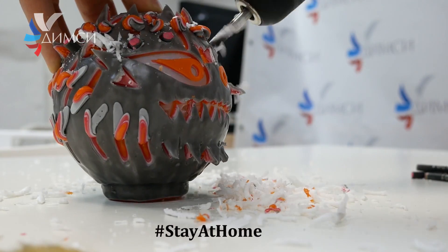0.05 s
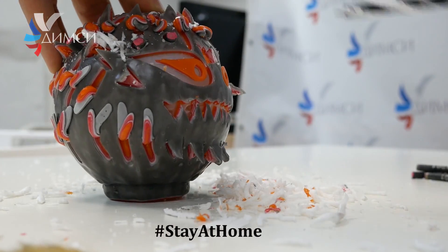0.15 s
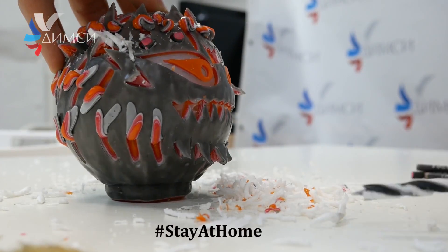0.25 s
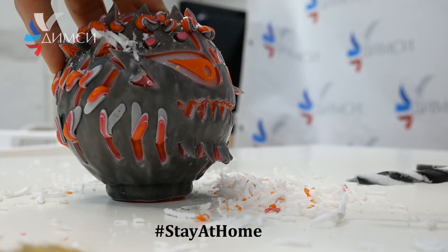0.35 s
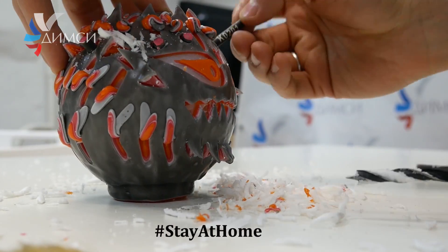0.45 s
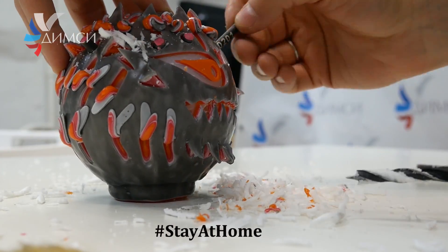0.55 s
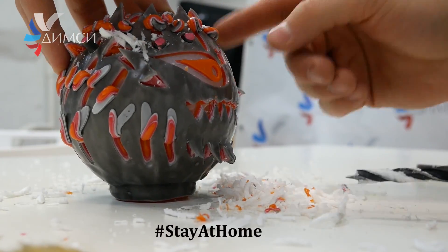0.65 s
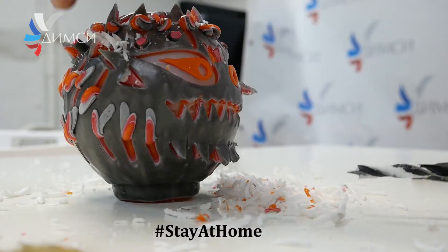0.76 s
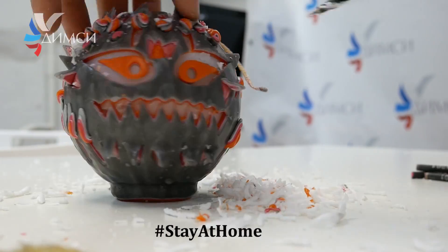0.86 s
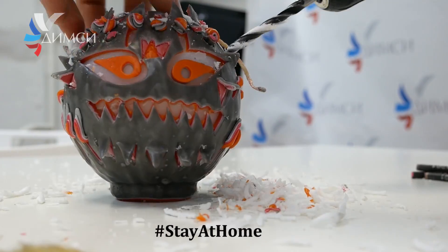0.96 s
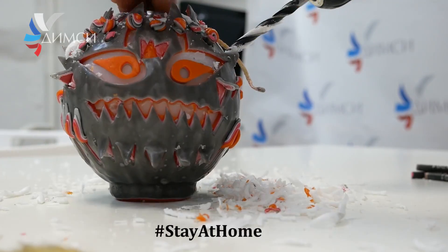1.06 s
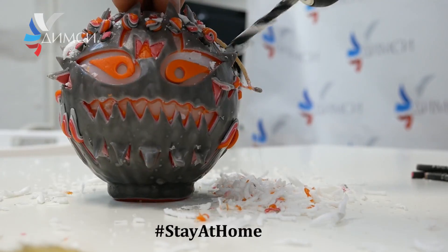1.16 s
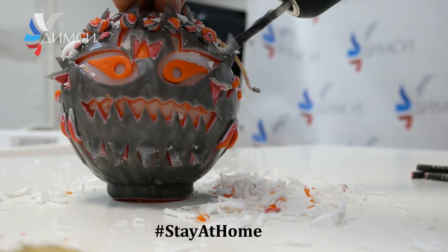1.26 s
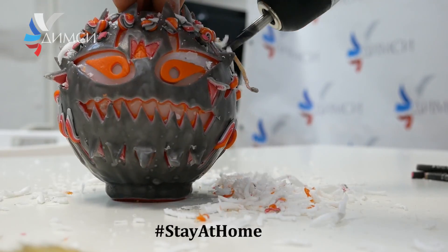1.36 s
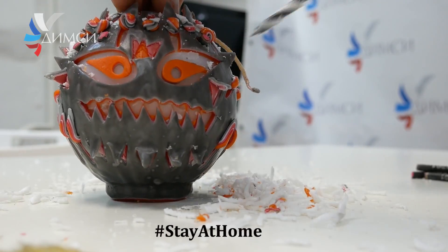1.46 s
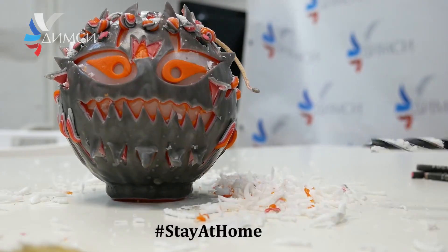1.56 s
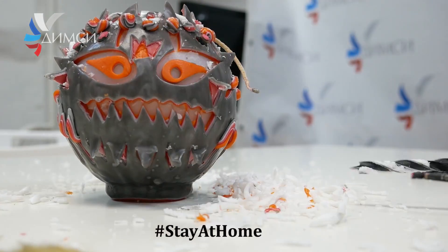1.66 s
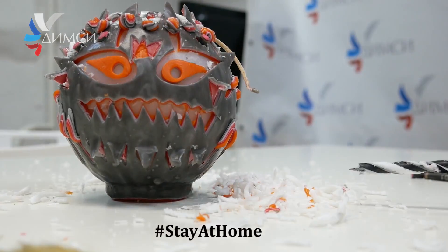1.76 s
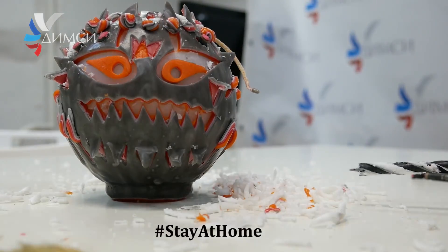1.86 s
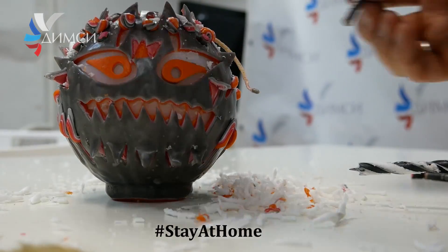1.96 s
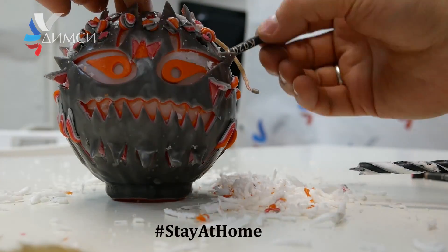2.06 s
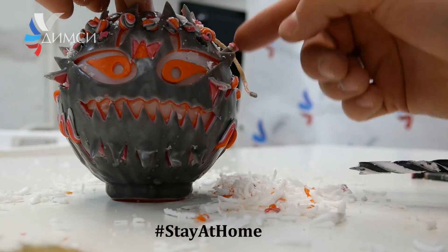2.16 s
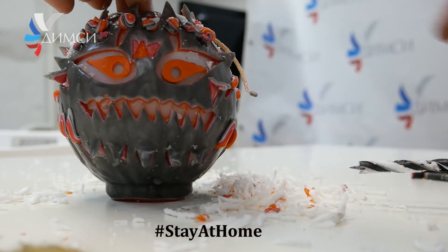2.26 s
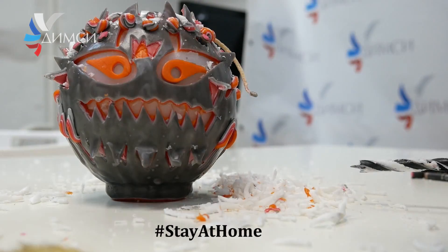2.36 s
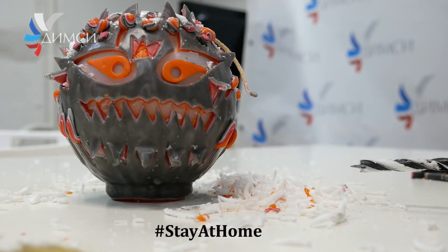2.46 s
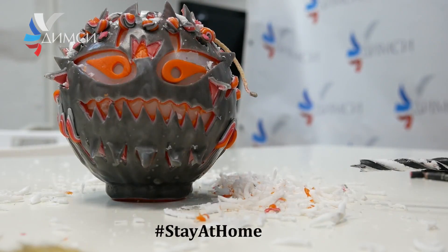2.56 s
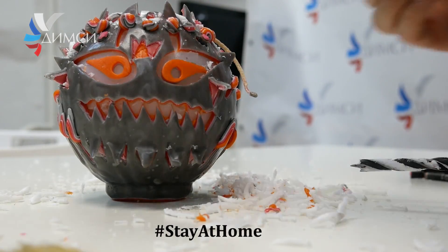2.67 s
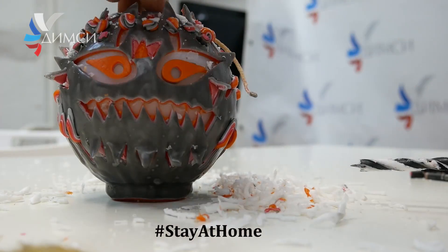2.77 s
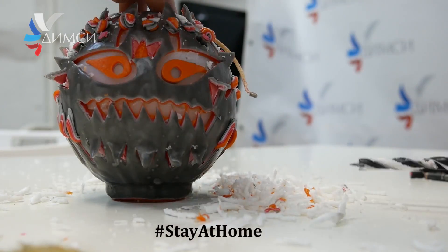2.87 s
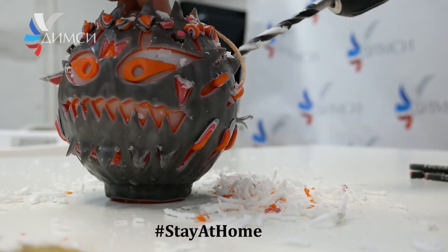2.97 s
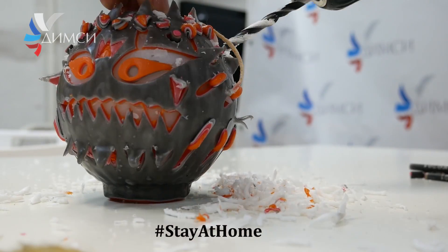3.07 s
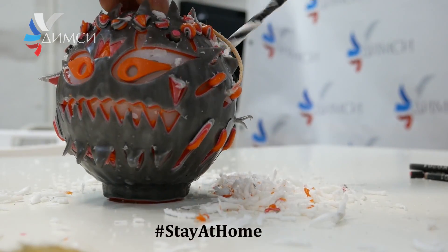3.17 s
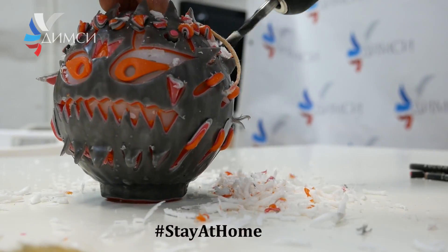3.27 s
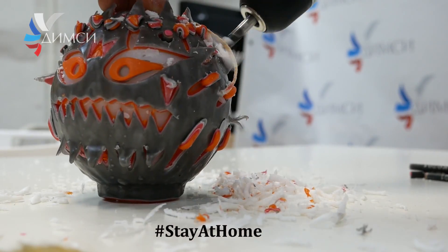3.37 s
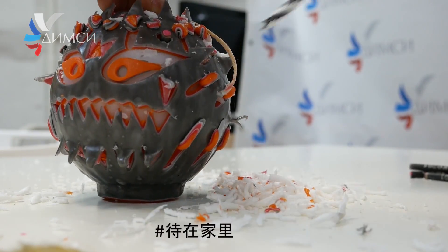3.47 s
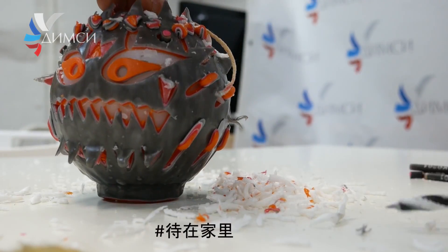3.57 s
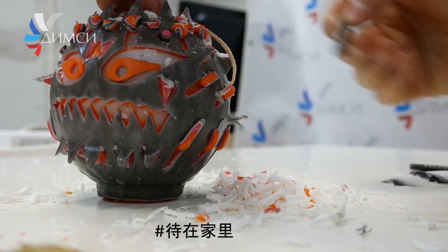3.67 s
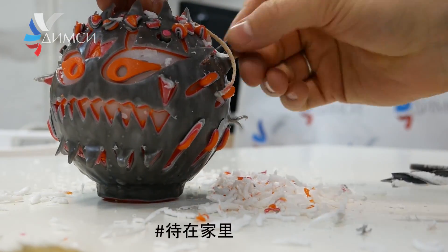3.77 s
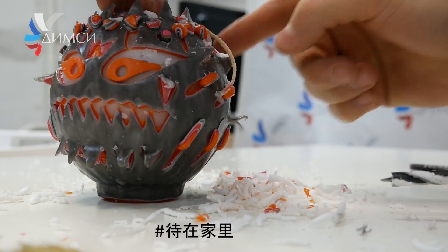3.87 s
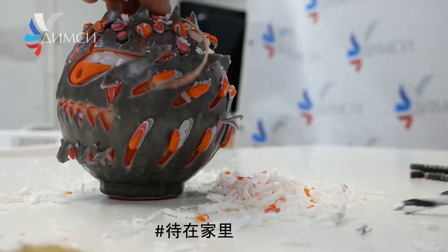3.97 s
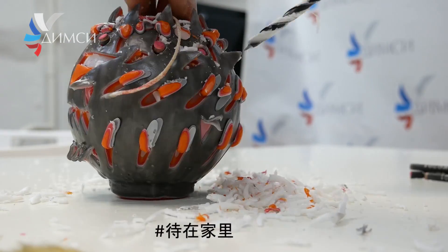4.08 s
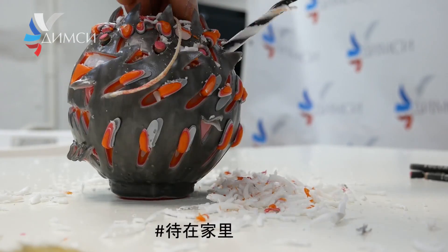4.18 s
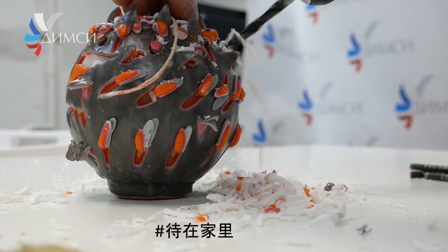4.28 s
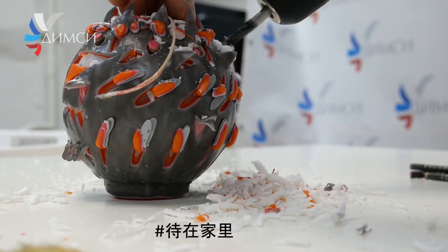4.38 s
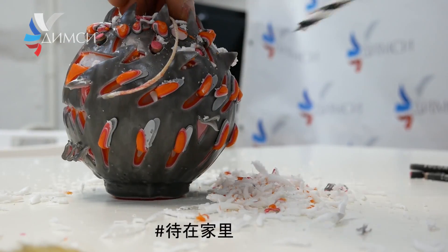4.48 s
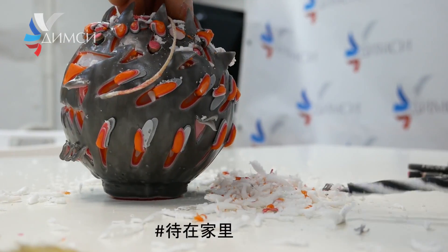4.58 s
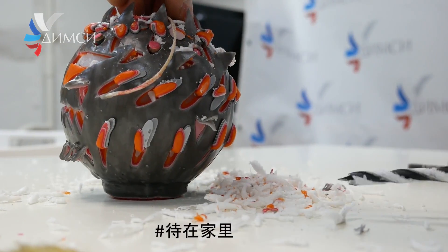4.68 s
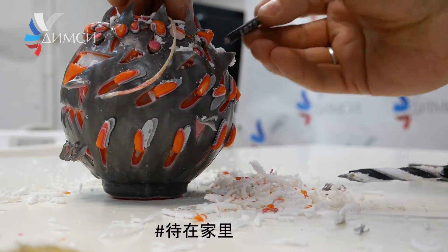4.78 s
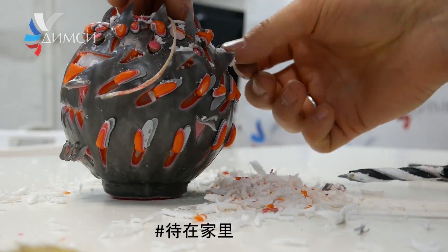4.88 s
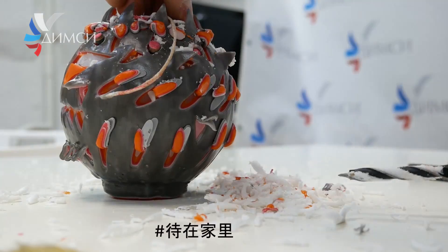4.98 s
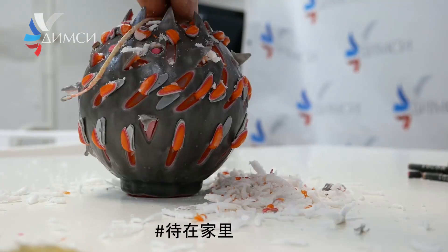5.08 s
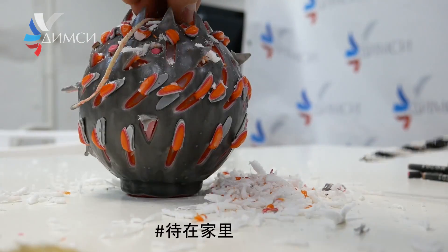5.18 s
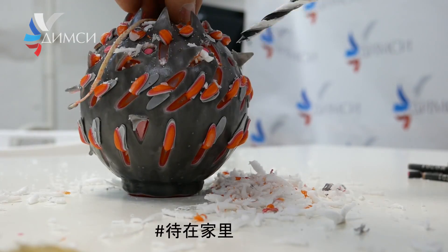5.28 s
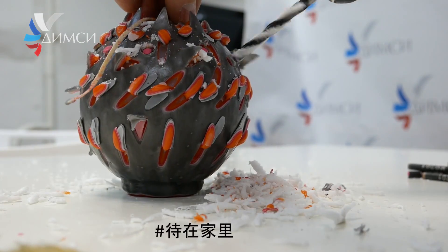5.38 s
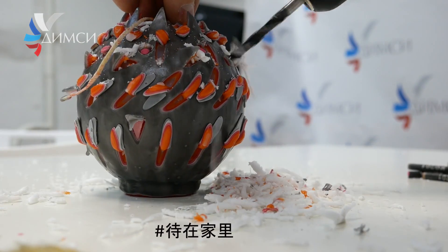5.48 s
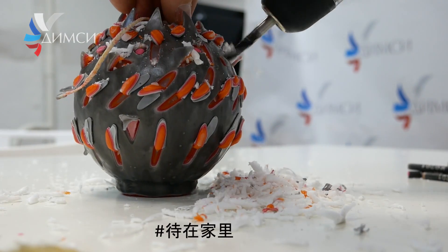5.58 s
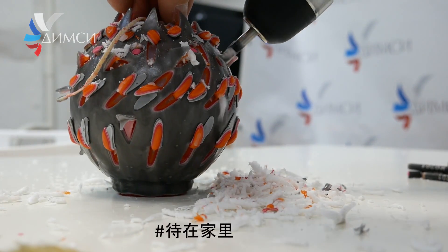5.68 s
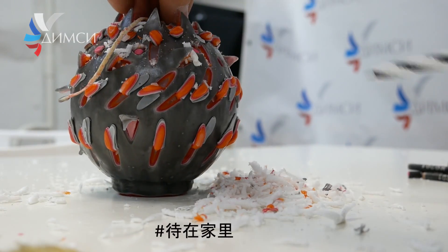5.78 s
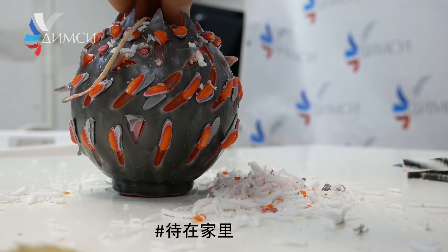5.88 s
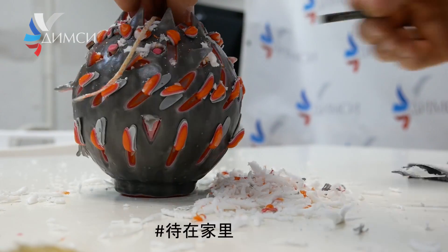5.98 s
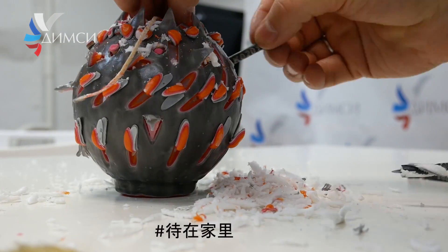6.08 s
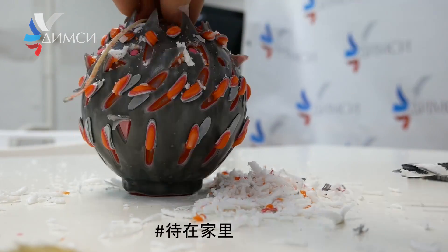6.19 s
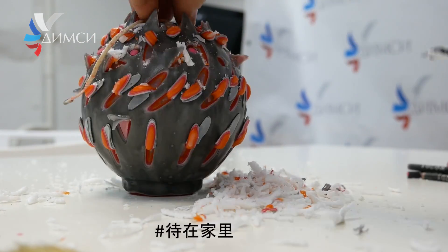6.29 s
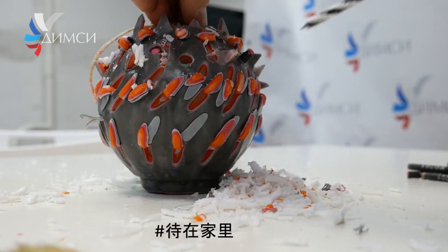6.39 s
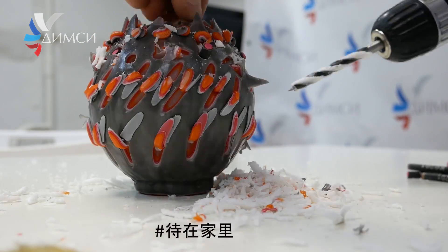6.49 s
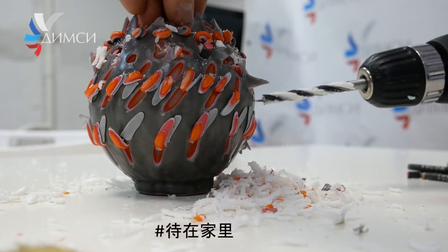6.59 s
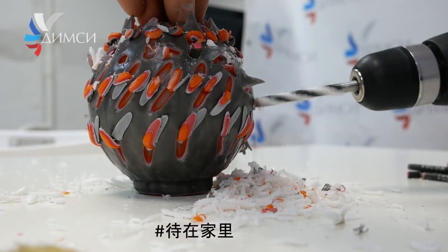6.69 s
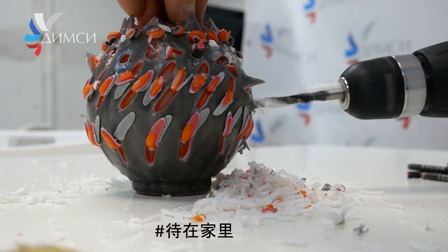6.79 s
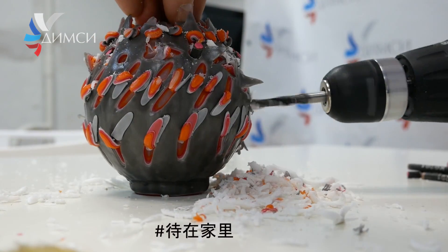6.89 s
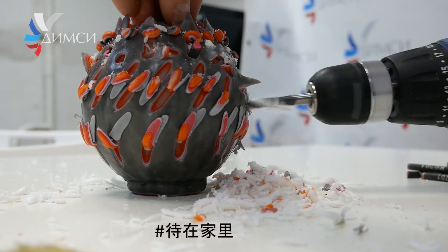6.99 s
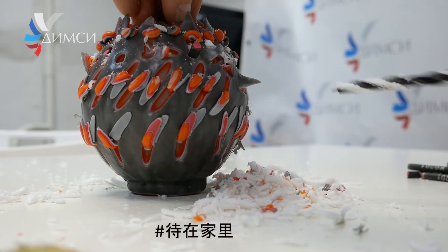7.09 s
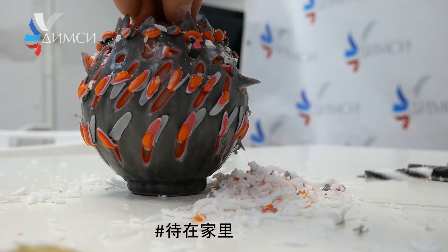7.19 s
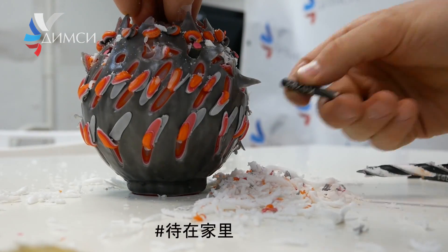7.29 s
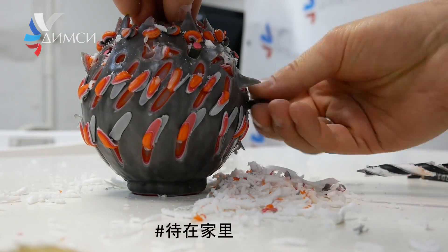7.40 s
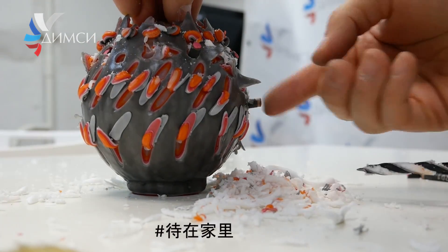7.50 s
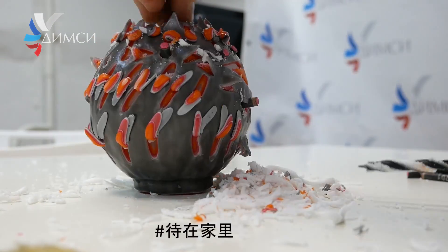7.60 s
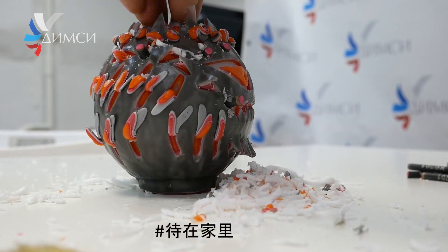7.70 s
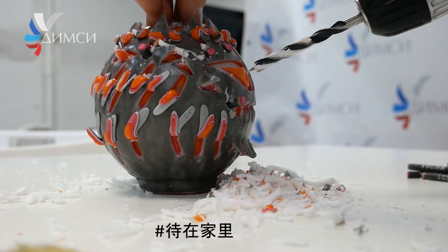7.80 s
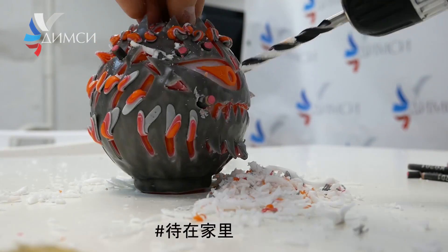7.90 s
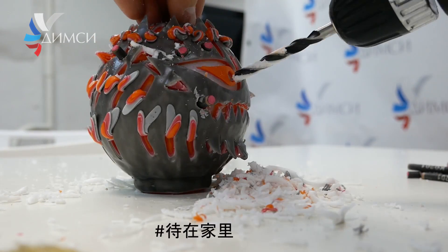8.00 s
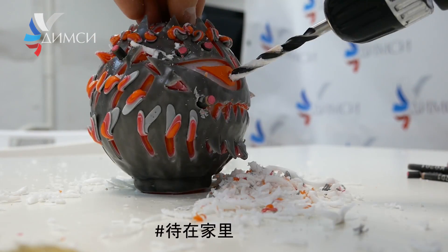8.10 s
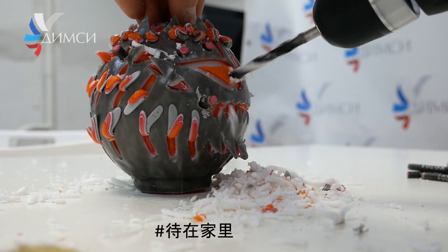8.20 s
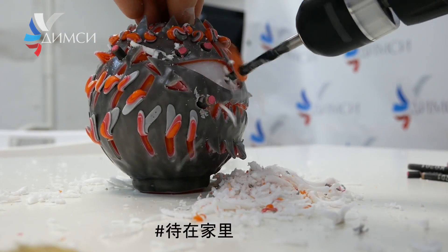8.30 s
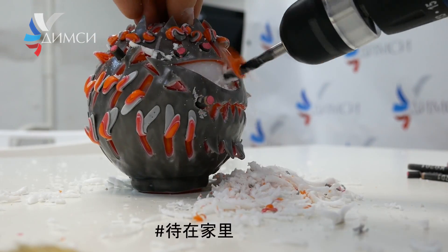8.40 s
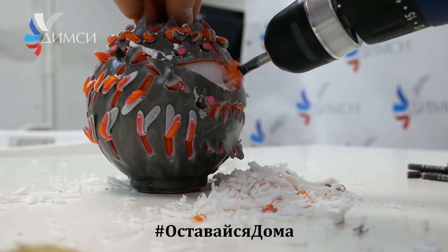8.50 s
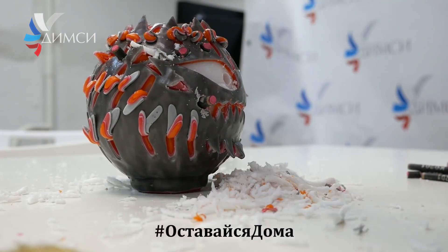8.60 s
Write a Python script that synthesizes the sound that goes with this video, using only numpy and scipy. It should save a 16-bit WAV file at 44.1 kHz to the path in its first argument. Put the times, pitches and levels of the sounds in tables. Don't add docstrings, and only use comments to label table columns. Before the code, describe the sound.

A cordless drill whirs in seven short bursts into a wax ball, each spinning down to a trigger thump, with clicks and rustling between.

```python
import sys
import numpy as np
from scipy import signal
from scipy.fft import rfft, irfft, next_fast_len
from scipy.io import wavfile

SR = 44100
rng = np.random.default_rng(int(sys.argv[2]) if len(sys.argv) > 2 else 0)


def voltage_ratio(level):
    return 10 ** (np.asarray(level, float) / 20)


def unload_audio(sound):
    columns = np.transpose(np.atleast_2d(sound))
    steps = np.round(np.clip(columns, -1, 1) * 32767)
    wavfile.write(sys.argv[1], SR, steps.astype(np.int16))


N = 381465
FAST = next_fast_len(N)
LEFT_RIGHT = np.array([[1], [-1]])


def at_hz(points, hz):
    points = np.array(points)
    return np.interp(np.log(hz), np.log(points[:, 0]), points[:, 1])


def drift(rate_hz, at=slice(None)):
    lowpass = signal.butter(2, rate_hz, fs=SR / 20, output="sos")
    slow = signal.sosfilt(lowpass, rng.standard_normal((2, N // 20 + 1002)))[:, 1000:]
    slow = slow / slow.std()
    where = np.arange(N)[at] / 20
    return np.array([np.interp(where, np.arange(len(row)), row) for row in slow])


def coloured(source, gain, low_hz, high_hz):
    hz = np.arange(1, FAST // 2 + 2) * SR / FAST
    edges = ((1 + (low_hz / hz) ** 8) * (1 + (hz / high_hz) ** 8)) ** -.5
    out = irfft(source * gain(hz) * edges, FAST)[:, :N]
    return out / out.mean(axis=0).std()


def burst(length, rise_s, t60_s):
    t = np.arange(length) / SR
    shape = (1 - np.exp(-(t / rise_s) ** 2)) * voltage_ratio(-60 * t / t60_s)
    return shape / shape.max()


def add(out, start_s, sound, pan_db):
    i = round(start_s * SR)
    out[:, i:i + sound.shape[1]] += (sound * voltage_ratio(LEFT_RIGHT * pan_db / 2))[:, :N - i]


# (pitch_hz, level_db per Hz)
ROOM_COLOUR = [(15, -46), (25, -17.5), (207, -3.5), (269, -3.5), (465, -6), (784, -8.5), (1040, -13),
               (2060, -21), (2600, -22.5), (3130, -25), (9860, -50.5), (12800, -42.5), (16600, -80.5),
               (22000, -120)]
# hum, finger rustle, its bright part [Hz]
QUIET_EDGES_HZ = [15, 1200, 4000, 14000]
# resting level [dB], dip just after a drill burst [dB], share of a hand's rustle
REST_DB = [-59, -68.5, -77]
DUCK_DB = [7, 8.5, 3]
HAND_SHARE = [0.63, 0.95, 1.08]
# (middle_s, length_s, above_rest_db)
HANDS = [(0.858, 0.27, 7), (1.889, 0.011, 9), (2, 0.13, 8), (2.416, 0.0099, 13), (2.44, 0.13, 5),
         (2.547, 0.055, 9.5), (3.065, 0.074, 5.5), (4.097, 0.14, 5), (5.05, 0.039, 5.5),
         (5.189, 0.018, 12.5), (5.21, 0.066, 6), (5.414, 0.16, 6), (6.38, 0.082, 5), (6.466, 0.25, 1.5),
         (7.704, 0.15, 8), (7.954, 0.061, 5)]


def room():
    recover_s, hand_grain = 0.12, 0.18
    t, out, shared = np.arange(N) / SR, 0, drift(25)[0]
    ducked = 0
    for *_, halt_s in HOLES:
        ducked = ducked + (t > halt_s - .1) * np.exp(-np.maximum(t - halt_s, 0) / recover_s)
    hand_db = sum(db * np.exp(-((t - s) / length_s) ** 2) for s, length_s, db in HANDS)
    for k, flicker_db in enumerate([1.2, 1.5, 1.5]):
        noise = rfft(rng.standard_normal((2, FAST)))
        layer = coloured(noise, lambda hz: voltage_ratio(at_hz(ROOM_COLOUR, hz)), *QUIET_EDGES_HZ[k:k + 2])
        rustle_db = HAND_SHARE[k] * hand_db * (1 + hand_grain * drift(50))
        level_db = REST_DB[k] - DUCK_DB[k] * ducked + rustle_db
        out = out + layer * voltage_ratio(level_db + flicker_db * (shared + 0.5 * drift(30)))
    return out


SNAP_LAG_S = .003
# (start_s, peak_db, pitch_hz, upper_part_db, left_right_db)
KNOCKS = [(0.92, -19.5, 272, -45, 6), (2.941, -37.5, 382.8, -42, 3), (3.069, -31, 261, -68, -1),
          (4.039, -19.5, 311, -14.5, 7.5), (5.063, -34, 253, -54, 0), (5.322, -40, 454, -29.5, 1.5),
          (6.263, -49, 161, -72, 7), (6.37, -50, 265, -47, 12), (6.567, -43.5, 272, -66, 6),
          (7.615, -45, 150, -62, 4), (7.667, -39.5, 215, -64, -8), (7.232, -35, 173, -45, 6),
          (5.082, -37, 445, -36, 4)]
# (start_s, peak_db, upper_part_db)
KICKS = [
    (1.167, -33.5, -26),
    (3.208, -45, -42),
    (4.24, -37, -21),
    (5.433, -30.5, -25),
    (6.708, -36.5, -22.5),
    (8.183, -45, -24),
]
# (peak_db, pitch_hz, upper_part_db, left_right_db, rebound_db)
SNAPS = [
    (-24.5, 230, -31, 2, -32.5),
    (-21.5, 400, -24.5, .5, -53),
    (-24.5, 230, -31, 1, -40),
    (-21, 266, -20, 0.5, -28),
    (-19.5, 300, -25, 1, -45),
    (-23.5, 450, -24.5, -1, -39),
]


def blows():
    rows = list(KNOCKS)
    rows += [(s, db, 249, upper_db - 9, 8) for s, db, upper_db in KICKS]
    for (_, snap_s, _), (db, hz, upper_db, pan_db, rebound_db) in zip(HOLES, SNAPS):
        rows.append((snap_s + SNAP_LAG_S, db, hz, upper_db, pan_db))
        rows.append((snap_s + 0.054, rebound_db, 179, rebound_db - 36, 0))
    return rows


# (pitch_hz, level_db, die_away_60db_s)
TABLE = [
    (51.5, -27, 0.027),
    (161, -16.5, 0.068),
    (577, -2, 0.02),
    (754, -3, 0.0075),
]


def thumps():
    out, t, rows = np.zeros((2, N)), np.arange(3500) / SR, blows()
    chance = rng.normal(0, 1, (len(rows), 2, 2, len(TABLE) + 1, 1))
    puff_band = signal.butter(2, [450, 1300], "band", fs=SR, output="sos")
    push_band = signal.butter(2, [90, 480], "band", fs=SR, output="sos")
    puffs = signal.sosfilt(puff_band, rng.standard_normal((len(rows), 2, len(t))))
    pushes = signal.sosfilt(push_band, rng.standard_normal(puffs.shape))
    for (s, db, hz, upper_db, pan_db), (phase, strength), puff, push in zip(rows, chance, puffs, pushes):
        struck = np.sin(2 * np.pi * hz * t + 0.32 * phase[:, 0])
        sound = voltage_ratio(db) * burst(len(t), 0.004, 0.025) * struck
        sound = sound + voltage_ratio(db + 13.5) * burst(len(t), 0.0065, 0.02) * push
        sound = sound + voltage_ratio(upper_db) * burst(len(t), 0.0035, 0.038) * puff
        for k, (mode_hz, mode_db, t60_s) in enumerate(TABLE):
            base_db = db if mode_hz < 500 else upper_db
            gain = voltage_ratio(base_db + mode_db - 1.5 + 5.1 * strength[:, k + 1]) * burst(len(t), 0.014, t60_s)
            sound = sound + gain * np.sin(2 * np.pi * mode_hz * t + 1.31 * phase[:, k + 1])
        add(out, s - .001, sound, pan_db)
    return out


# (start_s, peak_db, ring_hz, above_4500_hz_db, left_right_db)
CLICKS = [(2.4075, -30.5, 1440, -55.5, -3), (2.8935, -23, 1150, -67, -1), (2.9439, -24.5, 1770, -71, 1),
          (2.9705, -36, 1130, -72, -5), (3.0846, -40.5, 1280, -59, 0), (4.0382, -18, 1220, -51, -4),
          (4.6124, -19, 1540, -40, -8), (5.0794, -22, 2330, -62, -1), (5.1193, -25, 2780, -45.5, -1.5),
          (5.2915, -23, 2500, -40.5, -3.5), (5.3253, -28.5, 1626, -74, -4.5),
          (7.7773, -26, 1250, -48.5, -2), (8.2157, -21.5, 2680, -47, -9)]
# (start_s, peak_db, ring_hz)
TICKS = [(0.5772, -45.5, 1830), (0.8513, -52, 1100), (0.922, -62, 1040), (1.0316, -55, 1080),
         (1.96, -39.5, 2600), (2.4517, -40, 1370), (2.4962, -41, 1100), (2.5251, -41, 1670),
         (2.5539, -37, 1400), (2.588, -42, 1430), (2.659, -44, 1810), (3.07, -53, 1210),
         (3.1532, -50, 2334), (3.987, -38, 1550), (4.0922, -44, 3560), (5.412, -46, 3320),
         (6.323, -40, 2200), (6.361, -39.5, 1060), (6.384, -43, 1470), (6.4296, -43, 1020),
         (6.4553, -50, 1080), (7.7334, -40.5, 1490)]
# (start_s, peak_db, left_right_db)
BITES = [
    (1.1756, -19.5, -11),
    (3.2176, -20.5, -3),
    (4.246, -17.5, -4),
    (5.4474, -26, -2),
    (6.7125, -20, -6),
    (8.1854, -22, -6),
]


def crackles():
    rows = list(CLICKS)
    rows += [(s, db, 3130, db - 17, pan_db) for s, db, pan_db in BITES]
    rows += [(s + SNAP_LAG_S, db, 700, db - 36, 0) for s, _, db in KICKS]
    rows += [(s, db, hz, db - 30.5, -2) for s, db, hz in TICKS]
    return rows


def clicks():
    out, rows, t60_s = np.zeros((2, N)), crackles(), 0.03
    body = signal.butter(2, [450, 3000], "band", fs=SR, output="sos")
    dull = signal.butter(6, 4300, fs=SR, output="sos")
    edge = signal.butter(1, [4000, 7500], "band", fs=SR, output="sos")
    for (s, db, hz, edge_db, pan_db), noise in zip(rows, rng.standard_normal((len(rows), 2, 4000))):
        puff = noise * burst(noise.shape[1], 0.14 * t60_s, t60_s)
        ring = signal.lfilter(*signal.iirpeak(hz, 5.0, fs=SR), puff)
        middle = signal.sosfilt(dull, signal.sosfilt(body, puff) + 3.1 * ring)
        bright = signal.sosfilt(edge, puff)
        add(out, s - .003, voltage_ratio(db - 6.0) * middle + voltage_ratio(edge_db + 8) * bright, pan_db)
    return out


# (pulled_s, released_s, would_coast_to_rest_s, top_speed_turns_per_s, tone_db)
MOTOR = [
    (-.246, .133, .494, 505, -51),
    (1.155, 1.458, 1.85, 497, -51),
    (3.195, 3.489, 3.855, 502, -51),
    (4.228, 4.49, 4.85, 500, -50),
    (5.426, 5.787, 6.126, 496, -49),
    (6.693, 7.045, 7.399, 496, -50),
    (8.192, 8.569, 8.905, 495, -48),
]
# (rotor_tone_towards_microphone_db, left_right_db)
AIM = [
    (-2.5, -2.0),
    (-3, 0.5),
    (0.5, -1),
    (0, -1.5),
    (1.5, -1.5),
    (0.5, -3),
    (3, -1.5),
]


def motor():
    spin_up_s, coast_curve = .04, 1.35
    t = np.arange(N) / SR
    speed, tone_db, pan_db = np.zeros((3, N))
    for (pulled_s, released_s, rest_s, top_speed, level_db), (aim_db, side_db) in zip(MOTOR, AIM):
        on = (t > pulled_s - .05) & (t < rest_s + .05)
        rising = 1 - np.exp(-np.maximum(t[on] - pulled_s, 0) / spin_up_s)
        coasting = np.clip((rest_s - t[on]) / (rest_s - released_s), 0, 1) ** coast_curve
        speed[on] = top_speed * rising * coasting
        tone_db[on], pan_db[on] = level_db + aim_db, side_db
    return speed, tone_db, pan_db


# (gears_engage_s, trigger_snaps_back_s, chuck_halts_s)
HOLES = [
    (-.23, .274, .465),
    (1.17, 1.639, 1.792),
    (3.21, 3.614, 3.825),
    (4.236, 4.61, 4.818),
    (5.435, 5.89, 6.099),
    (6.704, 7.201, 7.365),
    (8.182, 8.7, 8.87),
]


def running(rise_s, fall_s):
    t, gate = np.arange(N) / SR, np.zeros(N)
    for start_s, _, halt_s in HOLES:
        rise = np.clip((t - start_s) / rise_s + .5, 0, 1)
        gate = np.maximum(gate, rise * np.exp(-np.maximum(t - halt_s, 0) / fall_s))
    return gate


# (pressure_db, gentle_start_db, bite_in_mid_hole_db, bite_as_bit_frees_db)
GRIP = [
    (2.5, 32, -3, 0.5),
    (0, 3, -0.5, 0),
    (1, 11, -2.5, 0.5),
    (1, 1.5, -2.5, 0),
    (0, 1.5, -0.5, 1.5),
    (0, 7.5, 3, -6),
    (-1, 10.5, 2.5, 1.5),
]
# table rumble, wax cutting, gear rattle, brush hiss
# level at full load [dB]
FULL_DB = [-49.5, -37, -32, -38]
ENGAGE_DB = [-6, -5, -7, -6]
GENTLE_SHARE = [.5, .6, 1.0, 1.3]
SNAP_DB = [4.5, 1, -8, -9.5]
COAST_DB = [0, -16, -12.5, -13.5]
STALL_DB = [-3, -17, -15, -24.5]
HALT_DB = [-8, -22, -32, -38]


def load():
    engage_s, warm_up_s, drive_lag_s = 0.021, 0.11, 0.014
    bite_in_s, bite_fade_s, coast_end_s, stall_s = 0.15, 0.3, .06, .016
    t, levels = np.arange(N) / SR, np.full((4, N), -90.)
    stages_db = np.transpose([ENGAGE_DB, [0] * 4, [0] * 4, SNAP_DB, COAST_DB, STALL_DB, HALT_DB])
    for (start_s, snap_s, halt_s), motor_row, grip in zip(HOLES, MOTOR, GRIP):
        pressure_db, gentle_db, bite_db, free_db = grip
        on = t > start_s - .1
        drive_end_s = motor_row[1] + drive_lag_s
        times_s = [start_s, start_s + engage_s, drive_end_s, snap_s,
                   halt_s - coast_end_s, halt_s - stall_s, halt_s]
        held_db = gentle_db * np.exp(-np.maximum(t[on] - start_s, 0) / warm_up_s)
        for k, stage_db in enumerate(stages_db):
            work_db = FULL_DB[k] + pressure_db + np.interp(t[on], times_s, stage_db)
            levels[k, on] = work_db - GENTLE_SHARE[k] * held_db
        bite_times_s = [start_s, start_s + bite_in_s, drive_end_s, snap_s, snap_s + bite_fade_s]
        levels[1, on] += np.interp(t[on], bite_times_s, [0, bite_db, bite_db, free_db, 0])
    return levels


# (pitch_hz, level_db per Hz)
DRILL_COLOUR = [(24, -57), (40, -16.5), (120, -13), (287, -1.5), (445, -6), (491, -5), (568, -5),
                (1020, -2.5), (2970, -4), (3610, -2.5), (7870, -16), (10500, -16), (12200, -20.5),
                (13400, -41)]
# (pitch_hz, width_hz, level_db)
HOUSING = [(1026, 53, 2.5), (1203, 50, -0.5), (407, 45, 5.5), (1674, 31, 2.5), (2110, 300, -2),
           (3100, 120, 4), (3343, 68, 3.5), (3130, 660, -1.5), (3830, 33, 1.5), (4740, 66, 4.5),
           (5990, 340, 2.5), (2776, 220, 1), (1385, 410, -4), (5500, 520, 1.5)]


def housing(hz):
    bumps_db = sum(db / (1 + (2 * (hz - centre_hz) / width_hz) ** 2) for centre_hz, width_hz, db in HOUSING)
    return voltage_ratio(at_hz(DRILL_COLOUR, np.maximum(hz, 20)) + bumps_db)


# (multiple_of_rotor_speed, level_db, wobble_db)
ORDERS = [
    (1, 1, 4.5),
    (2.0, -14.5, 6.5),
    (3.5, -4, -1),
    (4, 4, 1.5),
    (5, 2, -5.5),
    (7.5, -19, 10),
    (9, 1.5, -1.5),
]


def whine(speed, angle, tone_db, gear_db, on):
    out = 0
    for multiple, level_db, wobble_db in ORDERS:
        wander = 0.37 * multiple ** .5 * drift(13, on)
        gain = housing(multiple * speed) ** 0.85 * voltage_ratio(level_db + wobble_db * drift(5.4, on))
        out = out + gain * np.sin(multiple * angle + wander)
    turning = np.clip(speed / 150 - 1.6, 0, 1)
    return out * turning * voltage_ratio(tone_db + 0.8 * (gear_db + 34) + 5)


# (multiple_of_rotor_speed, off_full_speed_db, full_speed_db), against gear rattle
BARS = [
    (12, -6, -18),
    (24, -6.5, -18),
    (36, -10, -26),
]
VENT_TURNED_DB = [3.5, 6, 4, 3, -4, -4, -4]


def brushes(speed, angle, gear_db, on):
    vent_hz, vent_octaves = 3050, .42
    change = np.gradient(speed)
    out, slack = 0, np.clip(5 * (1 - speed / 495), 0, 1)
    turned_db = np.interp(on / SR, [row[2] - .1 for row in MOTOR], VENT_TURNED_DB)
    effort_db = np.where(change > 0, np.clip(41 - speed / 9, -9, 14), turned_db)
    for multiple, slack_db, steady_db in BARS:
        octaves_off = np.log2(multiple * speed / vent_hz + 1e-9)
        vent = .12 + np.exp(-.5 * (octaves_off / vent_octaves) ** 2)
        flutter_db = 3 * np.minimum(drift(25, on), .6) * (change <= 0)
        gain = vent * voltage_ratio(steady_db + (slack_db + effort_db - steady_db) * slack + flutter_db)
        out = out + gain * np.sin(multiple * angle + .9 * drift(70, on))
    return out * np.clip(speed / 40 - 2, 0, 1) * voltage_ratio(gear_db)


# (pitch_hz, width_hz, gain)
FACING = [
    [(1980, 200, 0.086), (3130, 360, 0.33)],
    [(2200, 160, 0.12), (3330, 510, 0.16)],
    [(2300, 230, 0.25), (3300, 510, 0.25)],
    [(2440, 340, 0.15), (3500, 460, 0.13)],
    [(2450, 290, 0.15), (3300, 220, 0.54)],
    [(1150, 150, 0.46), (1350, 290, 1), (2200, 830, 0.21)],
    [(3250, 240, 0.48), (4390, 740, 0.86), (4700, 50, 1), (1962, 6.8, 0.76), (993, 65, 0.23)],
]


def facing(x):
    out = x.copy()
    for (start_s, _, halt_s), peaks in zip(HOLES, FACING):
        span = slice(max(round(start_s * SR), 0), round((halt_s + .03) * SR))
        for hz, width_hz, gain in peaks:
            out[:, span] += gain * signal.lfilter(*signal.iirpeak(hz, hz / width_hz, fs=SR), x[:, span])
    return out


# (pitch_hz, left_right_db)
DRILL_SIDE = [(60, 6), (150, 4), (360, 1.5), (880, -4.5), (2160, -3.5), (5300, 0), (13000, 0)]
LAYER_EDGES_HZ = [20, 650, 1600, 6000, 14000]


def drill():
    echo_t60_s, echo_share = 0.14, 0.75
    speed, tone_db, pan_db = motor()
    angle = 2 * np.pi * np.cumsum(speed) / SR
    levels, shared = load(), drift(32)[0]

    def lean(hz):
        return housing(hz) * voltage_ratio(at_hz(DRILL_SIDE, hz) / 2 * LEFT_RIGHT)

    echoes = rng.standard_normal((2, 8000)) * voltage_ratio(-60 * np.arange(8000) / SR / echo_t60_s)
    echoes = echoes / np.linalg.norm(echoes, axis=1, keepdims=True)
    paths = rfft(echoes, FAST)
    out, on = np.zeros((2, N)), np.flatnonzero(speed > 50)
    out[:, on] = whine(speed[on], angle[on], tone_db[on], levels[2, on], on)
    out[:, on] += brushes(speed[on], angle[on], levels[2, on], on)
    # grain unevenness dB, pulse depth, flicker dB
    textures = [(3.8, .2, 2.6), (1.5, 0.25, 1.1), (0.73, 0.084, 1.45), (2.4, 0.19, 1.0)]
    for k, (grain_db, pulse, flicker_db) in enumerate(textures):
        grains = rfft(rng.standard_normal((3, N)) * voltage_ratio(grain_db * rng.exponential(1, N)), FAST)
        heard = echo_share * grains[2] * paths + np.sqrt(1 - echo_share ** 2) * grains[:2]
        layer = coloured(heard, lean, *LAYER_EDGES_HZ[k:k + 2])
        level_db = levels[k] + flicker_db * (drift(40) + 0.35 * shared)
        out = out + layer * (1 + pulse * np.cos(angle)) * voltage_ratio(level_db)
    return facing(out) * running(rise_s=0.014, fall_s=0.00068) * voltage_ratio(0.18 * pan_db * LEFT_RIGHT)


def scene():
    return room() + thumps() + clicks() + drill()


def roll_off(x):
    return signal.sosfilt(signal.butter(12, 13590, fs=SR, output="sos"), x)


def record(dry):
    notch_hz, notch_width_hz, cutoff_hz = 8000, 360, 12220
    dipped = signal.lfilter(*signal.iirnotch(notch_hz, notch_hz / notch_width_hz, fs=SR), dry)
    top_cut = signal.cheby2(8, 15, cutoff_hz + 250, fs=SR, output="sos")
    finished = signal.sosfilt(top_cut, 0.66 * dipped + 0.28 * dry)
    return roll_off(finished)


dry = scene()
out = record(dry)
unload_audio(out)
```